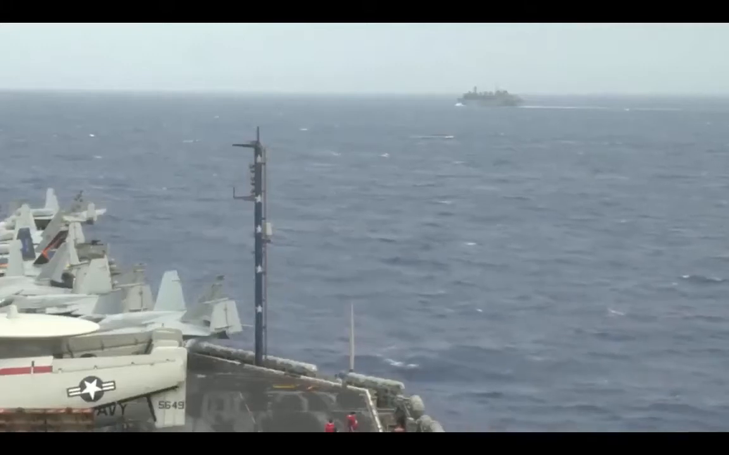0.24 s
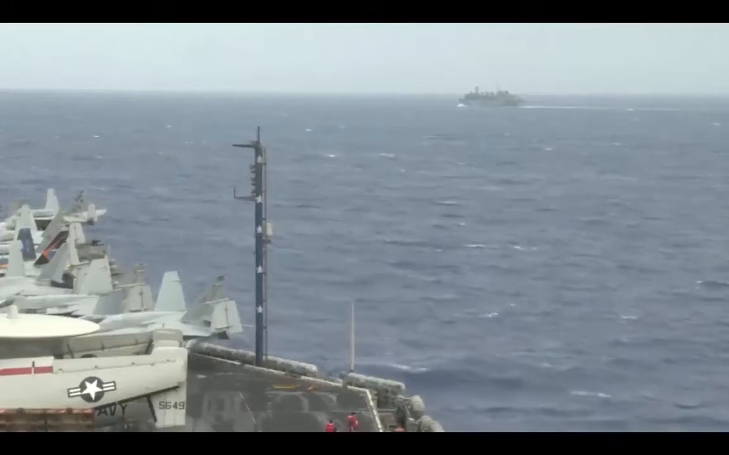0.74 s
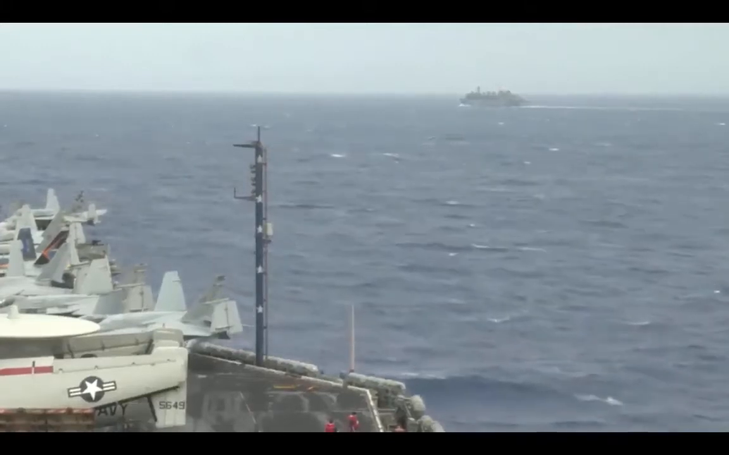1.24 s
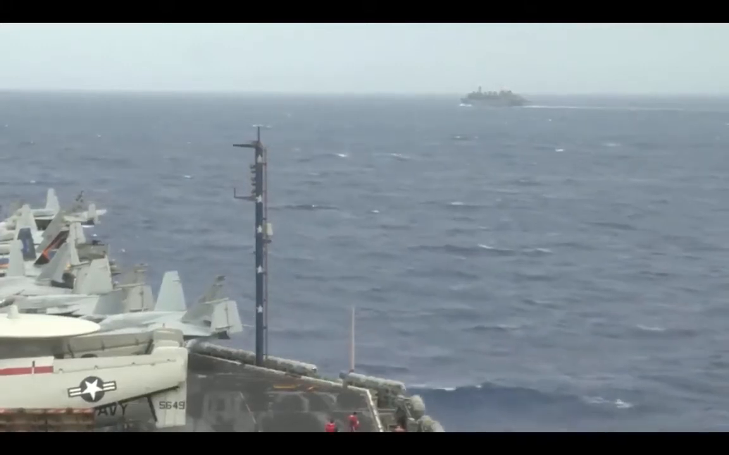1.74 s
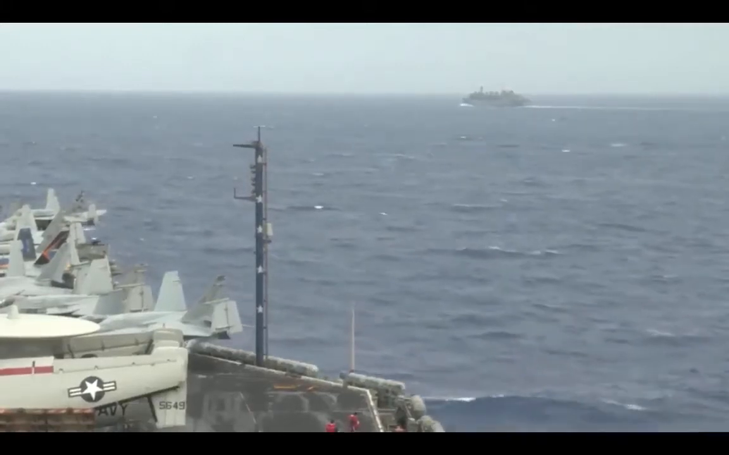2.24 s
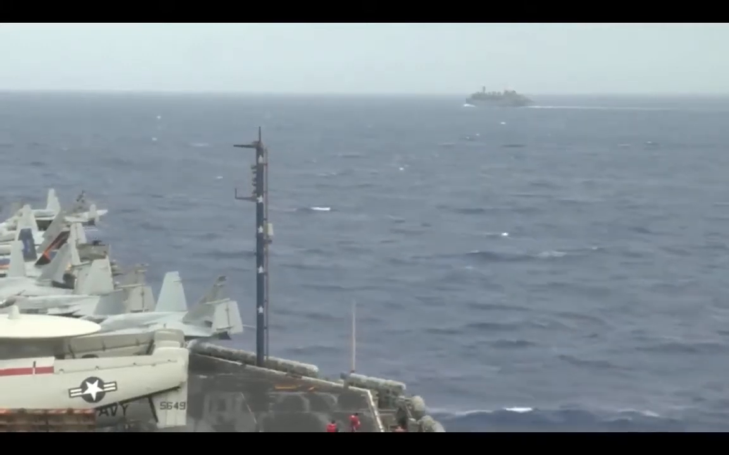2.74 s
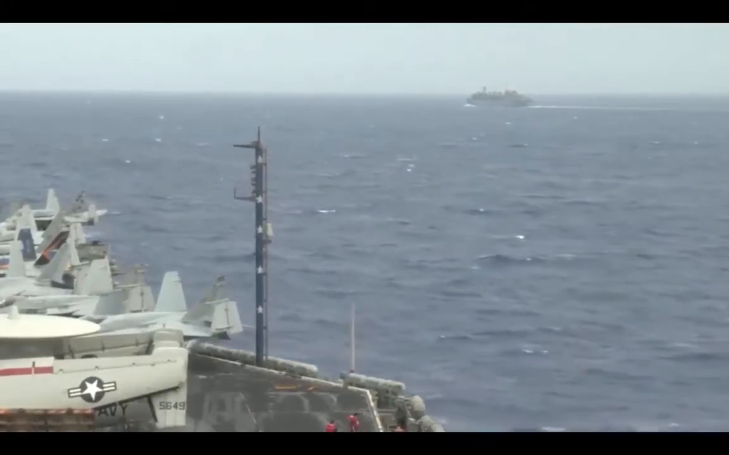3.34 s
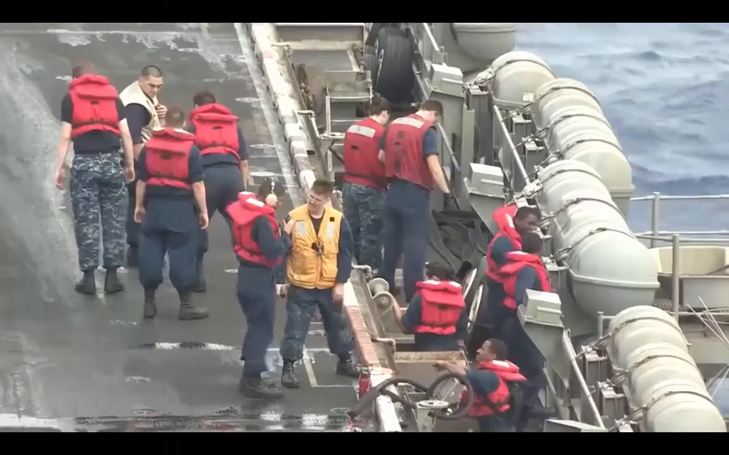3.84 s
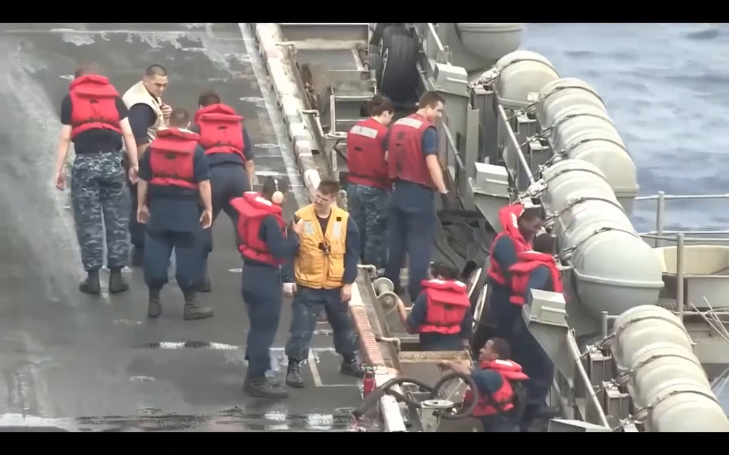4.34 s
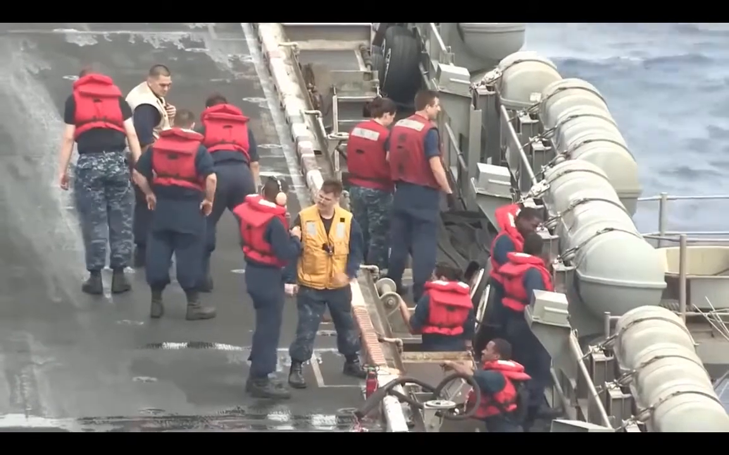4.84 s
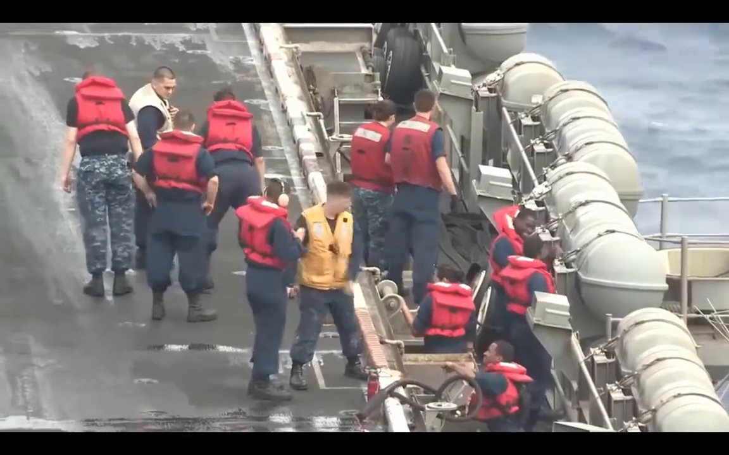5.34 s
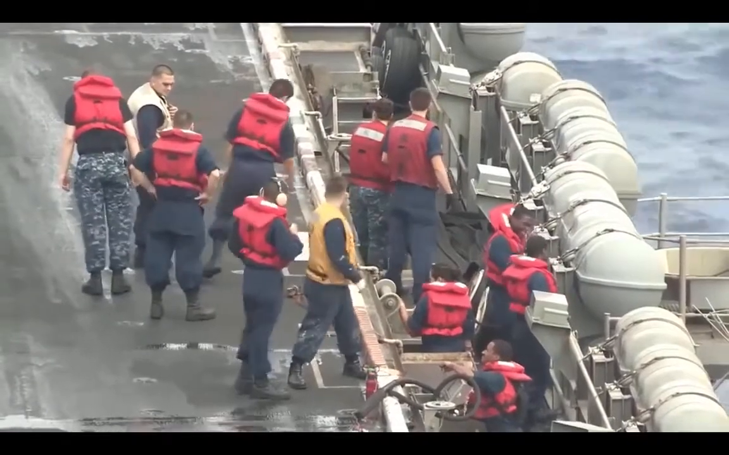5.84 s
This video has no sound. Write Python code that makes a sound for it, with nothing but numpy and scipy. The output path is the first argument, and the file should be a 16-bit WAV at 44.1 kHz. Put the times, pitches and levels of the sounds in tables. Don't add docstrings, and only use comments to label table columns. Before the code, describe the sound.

On an open ship's deck at sea, strong wind hits an unprotected microphone: deep rumble, fluttering gusts, rough tearing bursts and heavy thumps that overload it. Just before four seconds it cuts abruptly to a sheltered spot, far quieter, with a soft rush of air and sea wash, weak low thumps, a faint hollow drone and one tiny tick.

```python
import sys
import numpy as np
from scipy import signal
from scipy.fft import rfft, irfft, next_fast_len
from scipy.io import wavfile
from scipy.ndimage import uniform_filter1d

SR = 44100
rng = np.random.default_rng(int(sys.argv[2]) if len(sys.argv) > 2 else 0)


def volts(x):
    e = np.asarray(x, float) / 20
    return 10 ** e


def wav_out(sig):
    wavfile.write(sys.argv[1], SR, np.round(np.clip(np.atleast_2d(sig).T, -1, 1) * 32767).astype(np.int16))


N = 267990
FFT = next_fast_len(N)

# time in seconds, level in dB.
EXPOSED_WIND = [
    (0, -18),
    (.25, -16),
    (.45, -17),
    (1.3, -21.5),
    (1.38, -18.5),
    (2.1, -19),
    (2.4, -18),
    (2.45, -13),
    (3.7, -15),
    (3.84, -20.5),
]
SHELTERED_WIND = [
    (3.88, -42.5),
    (4.81, -49.5),
    (4.82, -43.5),
    (5.29, -40),
    (5.32, -47),
    (5.64, -49),
    (5.72, -35),
    (6.07, -38.5),
]


def level(x, db):
    return x * volts(db) / np.sqrt(np.mean(x ** 2))


def walk(rate):
    hold = int(SR / rate)
    steps = np.repeat(rng.standard_normal(N // hold + 1), hold)
    steps = uniform_filter1d(uniform_filter1d(steps, hold), hold)[:N]
    return level(steps - uniform_filter1d(steps, 5 * hold), 0)


def band(spectrum, hz, octaves):
    away = np.log2(np.fft.rfftfreq(FFT, 1 / SR)[1:] / hz) / octaves
    weight = np.cos(np.pi / 2 * np.clip(away, -1, 1)) ** 2
    return irfft(spectrum * np.r_[0, weight], FFT)[:N]


def bumps(events, second_flank):
    t = np.arange(0, N, 32) / SR
    out = np.zeros(len(t))
    for crest, db, length in events:
        flank = length * np.where(t < crest, 1, second_flank)
        out += db * np.exp(-((t - crest) / flank) ** 2)
    return np.interp(np.arange(N) / SR, t, out)


def drones():
    # resonance in Hz, bandwidth in Hz, level in dB.
    whistles = [
        (446, 26, -53.5),
        (266, 30, -55),
    ]
    out = np.zeros(N)
    for hz, width, db in whistles:
        peak = signal.iirpeak(hz, hz / width, fs=SR)
        out += level(signal.lfilter(*peak, rng.standard_normal(N)), db)
    return out * volts(1.2 * walk(6))


def tick():
    start_s, peak_db, decay_s = 4.8613, -29.5, 0.00025
    since = np.arange(N) - int(start_s * SR)
    return volts(peak_db) * (since >= 0) * np.exp(-np.maximum(since, 0) / (decay_s * SR))


def swells(wind, wash, inside):
    # crest in seconds, lift in dB, length in seconds.
    gusts = [(0.0, 8, 0.034), (0.19, 1, 0.014), (0.305, 7.5, 0.042), (0.59, 4.5, 0.049), (0.9, 0.5, 0.012),
             (1.4, 4, 0.019), (1.48, 5.5, 0.036), (1.58, 4.5, 0.015), (1.74, 6, 0.055), (2.0, 3.5, 0.019),
             (2.165, 7.5, 0.06), (2.23, 5, 0.023), (2.45, 2, 0.025), (2.53, 5.5, 0.022), (2.61, 1.5, 0.015),
             (2.69, 5, 0.026), (2.75, 9.5, 0.0087), (2.87, 3, .03), (3.04, 3.5, 0.047), (3.105, 6.5, 0.013),
             (3.39, 6, 0.047), (3.62, 3.5, 0.043), (3.72, 1, 0.031), (4.53, 2.5, .03), (4.85, 2, 0.015),
             (5.28, 0.5, 0.036), (5.4, 3, .03), (5.74, 0, 0.027), (5.87, 5, 0.018), (6.06, 2, .02)]
    # deepest point in seconds, depth in dB, length in seconds.
    lulls = [(0.66, -2.5, 0.044), (1.33, 2, 0.015), (2.14, -11, 0.048), (2.41, -4, 0.094),
             (2.73, -3.5, 0.018), (2.81, -1, 0.035), (3.07, -5.5, 0.015), (3.69, -6, 0.039),
             (4.46, -5, 0.018), (5.46, -5, 0.046), (5.71, -4.5, 0.041), (5.81, -4, 0.026), (6.04, -4, .04)]
    # throb, rumble, roar, rush, hiss in dB per dB.
    wash_follow = (.01, .01, 0.14, 0.62, 0.75)
    gust_follow = (0.43, .6, 1.03, 0.6, 0.3)
    lull_follow = (.2, 0.53, 0.88, 0.84, 1.03)
    t = np.arange(N) / SR
    curve, wind_follow = wind
    wind_db = np.interp(t, *np.transpose(curve))
    wash_db = np.interp(t, *np.transpose(wash))
    controls = [wind_db, wash_db, bumps(gusts, 0.91), bumps(lulls, 0.27)]
    follow = np.transpose([wind_follow, wash_follow, gust_follow, lull_follow])
    gains = volts(follow @ controls)
    return np.log(gains / np.sqrt(np.mean(gains[:, inside] ** 2, axis=1, keepdims=True)))


def air(wind, wash, colour, total_db, inside, eddy_db, flutter_db):
    gust_hz = (40, 120, 480, 1900, 7500)
    # frequency in Hz, width in Hz, lift in dB.
    housing = [
        (2620, 97, 0.5),
        (5270, 420, 2.5),
        (5830, 210, -1.5),
        (8500, 490, 0),
        (12100, 1000, 3),
    ]
    swell = swells(wind, wash, inside)
    hz, colour_db = np.transpose(colour)
    freq = np.fft.rfftfreq(FFT, 1 / SR) + 1
    housing_db = sum(lift * np.exp(-((freq - f) / width) ** 2) for f, width, lift in housing)
    response_db = np.interp(np.log(freq), np.log(hz), colour_db) + housing_db
    spectrum = rfft(rng.standard_normal(FFT)) * volts(response_db)
    eddies, flutter = walk(70), walk(62)
    out = np.zeros(N)
    for centre in 22 * 2 ** np.arange(0, 10, .5):
        place = np.interp(np.log(centre), np.log(gust_hz), np.arange(len(gust_hz)))
        low = min(int(place), len(gust_hz) - 2)
        share = place - low
        gust = np.exp((1 - share) * swell[low] + share * swell[low + 1])
        near = 1 / (1 + centre / 1500)
        shake = eddy_db * near * (eddies + 0.61 * walk(35))
        shimmer = flutter_db * (1 - near) * (flutter + 1.47 * walk(60))
        out += band(spectrum, centre, 0.533) * gust * volts(shake + shimmer)
    return out * volts(total_db) / np.sqrt(np.mean(out[inside] ** 2))


def rips():
    # start in seconds, peak in dB.
    fronts = np.array([(0.29, -9), (0.945, -20), (1.349, -23), (1.666, -24), (1.689, -30), (2.148, -10.5),
                       (2.442, -26), (2.601, -8.5), (2.743, -9.5), (3.256, -17), (3.375, -8.5),
                       (3.713, -38), (5.252, -34), (5.471, -27.5)])
    lift_db, rise_s, fall_s = -8, 0.0026, 0.0049
    tear_band = signal.butter(2, (450, 1300), "band", fs=SR, output="sos")
    tear = level(signal.sosfilt(tear_band, rng.standard_normal(N)), 0)
    since = np.arange(N) / SR - fronts[:, :1]
    shape = np.clip(since / rise_s, 0, 1) * np.exp(-np.maximum(since, 0) / fall_s)
    return tear * (volts(fronts[:, 1] + lift_db) @ shape)


def small_eddies():
    gap_s, over_wind_db, scatter_db = .1, 8.5, 1.5
    middle_hz, spread_octaves = 224, 0.61
    slots = np.arange(gap_s / 2, N / SR - gap_s, gap_s)
    late, size, pitch = rng.uniform(-1.1, 1, (len(slots), 3)).T
    crest = slots + late * gap_s / 2
    wind_db = np.interp(crest, *np.transpose(list(EXPOSED_WIND) + list(SHELTERED_WIND)))
    peak_db = wind_db + over_wind_db + scatter_db * size
    return list(zip(crest, peak_db, middle_hz * 2 ** (spread_octaves * pitch)))


def thumps():
    # crest in seconds, peak in dB, pitch in Hz.
    open_eddies = [(0.199, 2.5, 141), (0.237, -1, 183), (0.286, 0, 110), (0.391, -4, 183),
                   (0.592, -5.5, 124), (0.78, -2, 142), (0.899, 0.5, 174), (1.006, -6.5, 114),
                   (1.401, -0.5, 136), (1.465, -4, 155), (1.54, -6.5, 178), (1.719, -7, 96),
                   (1.786, -5, 179), (1.945, -5, 203), (2.164, -1.5, 131), (2.236, -16, 140),
                   (2.263, -3.5, 179), (2.464, -3.5, 107), (2.545, -6.5, 135), (2.698, 0, 123),
                   (2.741, 1.5, 195), (2.881, -1.5, 177), (2.939, -1, 157), (3.022, -5, 117),
                   (3.096, 1.5, 153), (3.217, -3.5, 120), (3.355, -2.5, 122), (3.459, 1, 119),
                   (3.614, -4, 132), (3.713, -1, 188)]
    # crest in seconds, peak in dB,
    # pitch in Hz.
    later_eddies = [(3.787, -7.7, 85), (3.815, -8.5, 213), (4.841, -26.5, 115), (4.882, -26, 166),
                    (5.024, -33, 161), (5.091, -24.5, 135), (5.193, -23.5, 96), (5.255, -22, 156),
                    (5.296, -26, 184), (5.484, -28, 260), (5.733, -19, 101), (5.875, -29, 320),
                    (5.946, -24, 172)]
    cycles, tail, lift_db = 0.59, 1.23, -3
    out = np.zeros(N + SR)
    slaps = list(open_eddies) + list(later_eddies) + small_eddies()
    phases = rng.uniform(0, 2 * np.pi, len(slaps))
    dull = signal.butter(4, 700, fs=SR, output="sos")
    puff = level(signal.sosfilt(dull, rng.standard_normal(N + SR)), -14)
    for (crest, db, hz), phase in zip(slaps, phases):
        middle = int(crest * SR)
        reach = min(int(4 * SR / hz), middle)
        turns = np.arange(-reach, reach) * hz / SR
        shape = np.exp(-(turns / np.where(turns < 0, cycles, cycles * tail)) ** 2)
        at = slice(middle - reach, middle + reach)
        out[at] += volts(db + lift_db) * shape * (np.cos(2 * np.pi * turns + phase) + puff[at])
    return signal.sosfilt(signal.butter(2, 55, "high", fs=SR, output="sos"), out[:N])


def scene():
    # frequency in Hz, spectral level in dB per Hz.
    exposed_air = [(22, -45), (52, -7), (90, -2), (180, -3), (300, -7.5), (420, -12), (700, -18.5),
                   (1700, -33), (2800, -38), (4000, -45.5), (6000, -49), (9000, -55.5), (13500, -66.5),
                   (15700, -70)]
    sheltered_air = [(22, -30), (52, -7.5), (100, -1.5), (290, -2.5), (350, -8), (430, -5), (600, -8.5),
                     (1000, -17), (2600, -24.5), (4000, -32), (6000, -37.5), (9000, -44), (13500, -54),
                     (15700, -55)]
    # time in seconds, level in dB.
    exposed_wash = [
        (0, -48),
        (.5, -48.5),
        (.7, -51),
        (1.0, -52),
        (1.25, -47),
        (1.75, -49.5),
        (2.05, -48.5),
        (2.6, -46),
        (2.9, -48),
        (3.84, -47),
    ]
    sheltered_wash = [
        (3.85, -59),
        (4.05, -60),
        (4.25, -57),
        (4.7, -60),
        (5.74, -61),
        (6.08, -62.5),
    ]
    exposed_wind = (EXPOSED_WIND, (.9, 0.67, 0.85, 0.36, 0.061))
    sheltered_wind = (SHELTERED_WIND, (1, 0.73, 0.37, 0.03, .01))
    cut_s, fade_s, splice_s = 3.845, .03, .0012
    t = np.arange(N) / SR
    before = t < cut_s
    exposed = air(exposed_wind, exposed_wash, exposed_air, -17, before, eddy_db=1.44, flutter_db=1.0)
    sheltered = air(sheltered_wind, sheltered_wash, sheltered_air, -37, ~before, eddy_db=1.0, flutter_db=0.91)
    fade = np.clip(.5 + (cut_s - t) / fade_s, 0, 1)
    splice = np.clip((t - cut_s) / splice_s, 0, 1)
    slaps = thumps() * np.clip(np.abs(t - cut_s) / fade_s, 0, 1)
    open_deck = exposed * fade * (1 - splice)
    shelter = (sheltered + drones()) * splice
    mix = open_deck + slaps + rips() + tick() + shelter
    return mix[None]


def band_limit(x):
    return signal.sosfilt(signal.butter(12, 15750, fs=SR, output="sos"), x)


def record(dry):
    overload = .75
    x = dry / overload
    flat = overload * x / (1 + np.abs(x) ** 8) ** (1 / 8)
    return band_limit(flat)


dry = scene()
out = record(dry)
wav_out(out)
```